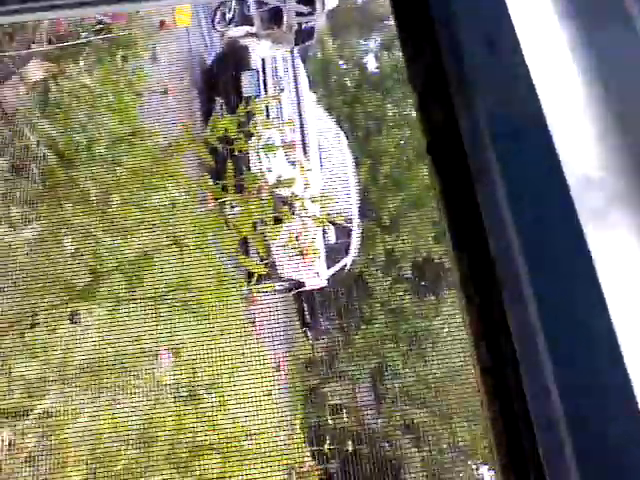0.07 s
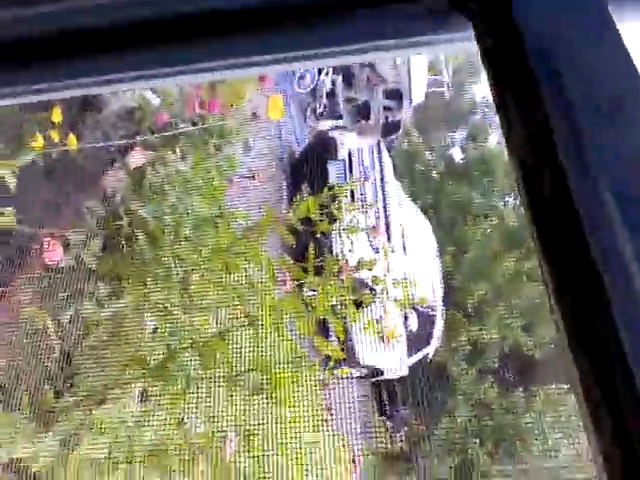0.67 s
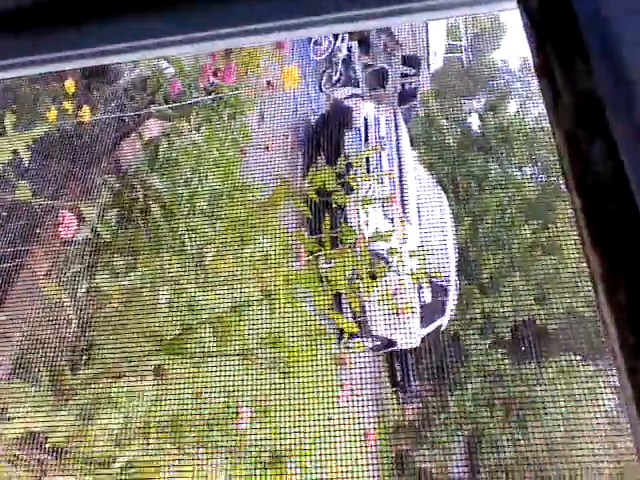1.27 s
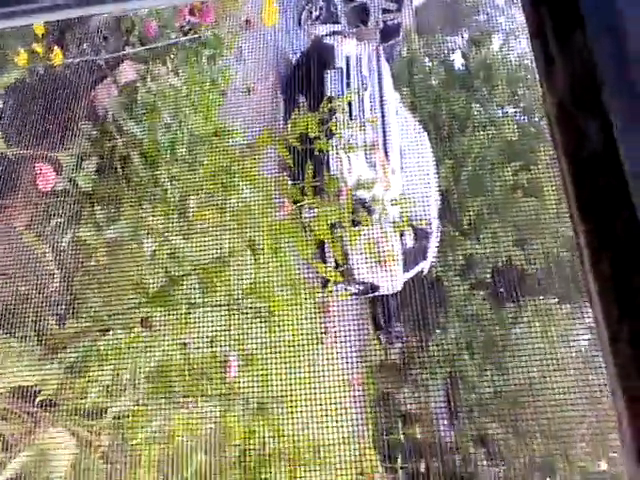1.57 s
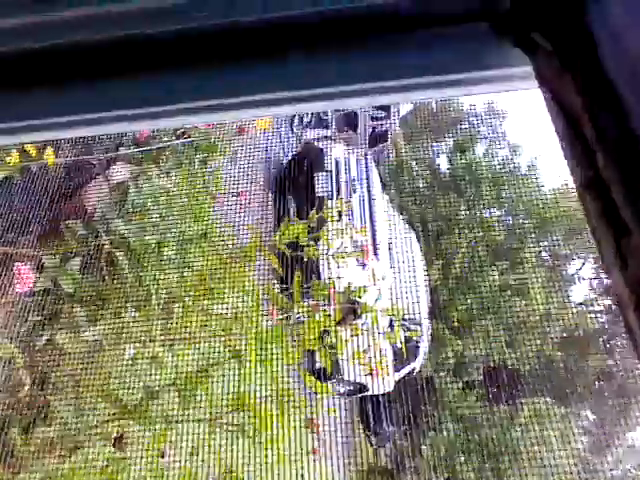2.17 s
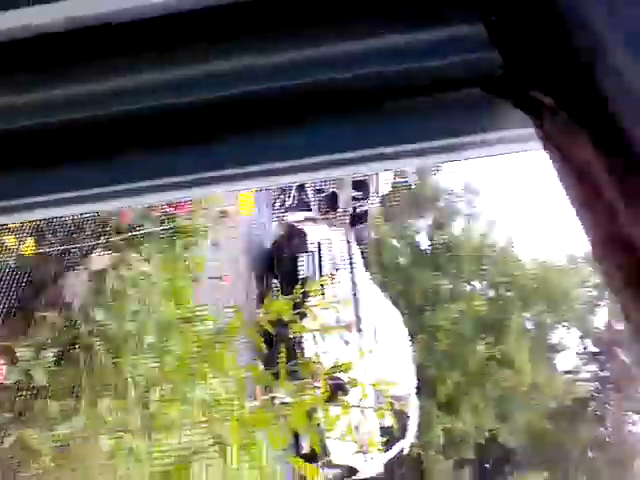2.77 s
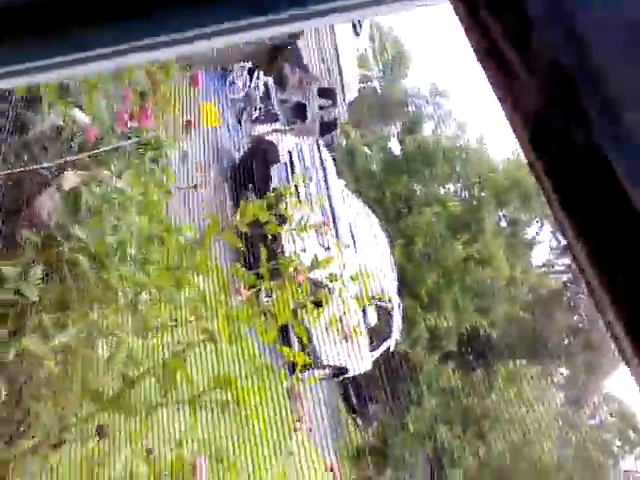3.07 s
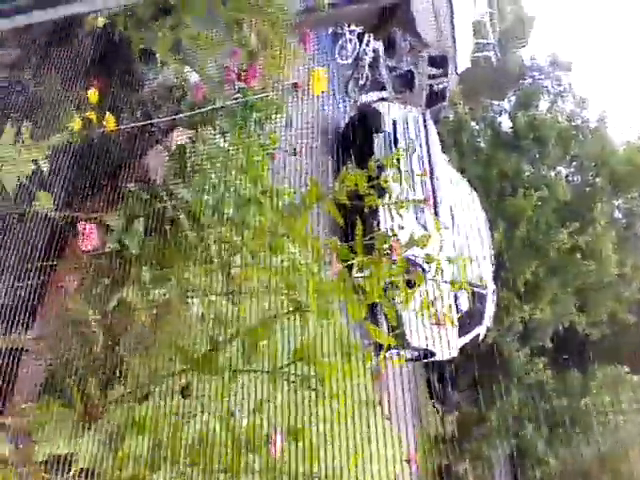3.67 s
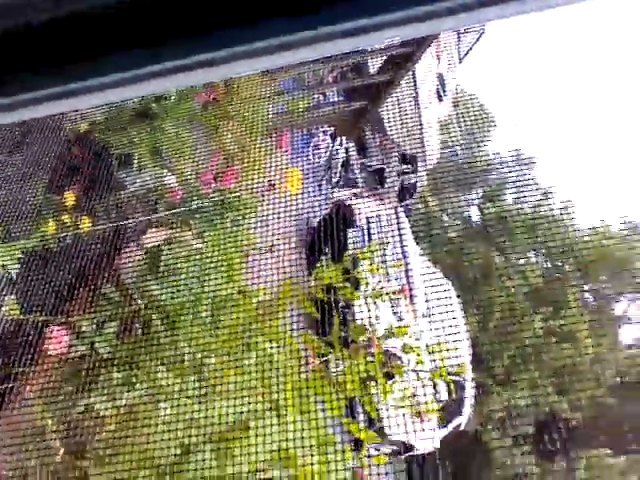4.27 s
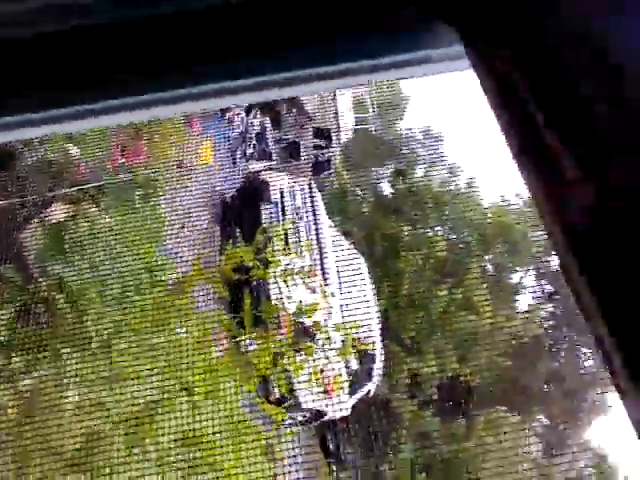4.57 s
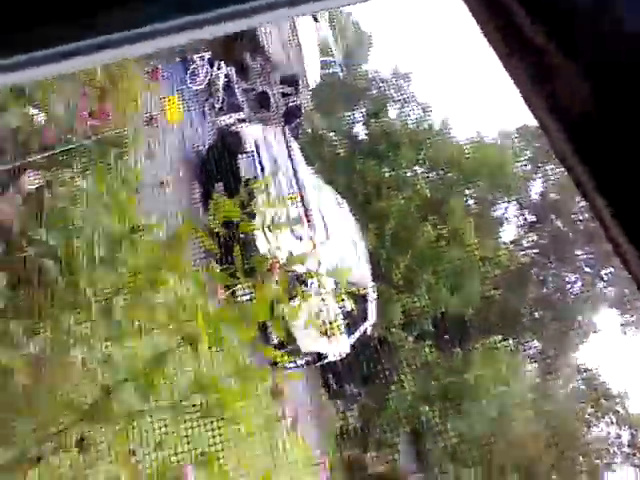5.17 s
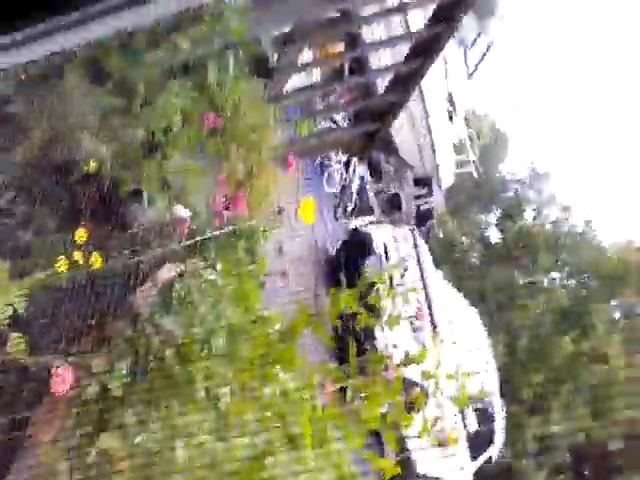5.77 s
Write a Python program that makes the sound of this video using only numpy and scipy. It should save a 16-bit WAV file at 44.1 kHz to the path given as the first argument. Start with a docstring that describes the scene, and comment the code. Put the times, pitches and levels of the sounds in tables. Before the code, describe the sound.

Fingers rub, bump and click on a small camera's plastic case, right at the microphone, over faint outdoor air.

```python
"""Fingers bump, rub and click on the plastic case of a small camera as it is shifted about in the hand.
The case carries it all straight to the microphone, with one short squeak and a few soft palm thuds.
The camera is held behind a window screen. Underneath lie faint outdoor air and the hiss, whine and
buzz of its own electronics."""
import sys
import numpy as np
from scipy import signal
from scipy.fft import rfft, irfft
from scipy.io import wavfile
from scipy.ndimage import uniform_filter1d

SR = 44100
rng = np.random.default_rng(int(sys.argv[2]) if len(sys.argv) > 2 else 0)


def persist_wave(psi):
    """Save psi, clipped to +-1, as 16-bit WAV."""
    counts = np.round(np.clip(psi, -1, 1) * 32767).astype(np.int16)
    wavfile.write(sys.argv[1], SR, np.atleast_2d(counts).T)


N = 264864
TIME = np.arange(N) / SR


def fingers(grip_wander_db=5.5):
    """Strokes over a restless grip, right at the microphone: shell rasp, skin hiss and body rumble."""
    # a finger crossing the case: start_s, length_s, fade_s, rasp_db, hiss_db, rumble_db,
    # force_growth_db, far_side_share
    strokes = [ (0.169, .02, .01, -48.5, -49.5, -57, 2, 0.06),
               (0.278, 0.043, .015, -43, -48.5, -41, 9, 0.6),
               (0.334, 0.17, 0.069, -52, -60, -49, -11, 0.44),
               (0.913, 0.045, .015, -67.5, -79, -55.5, 0, 0.7),
               (1.327, 0.25, 0.039, -61, -74.5, -57, 16, 0.7),
               (1.788, .12, 0.0066, -40.5, -39, -42.5, 1, 0.6), (1.905, 0.069, .008, -43, -54, -50, -4, 1),
               (1.983, 0.12, 0.014, -38.5, -41.5, -40, -6, 0.18),
               (2.133, 0.12, 0.0033, -36.5, -32.5, -44, -2.5, 0.24),
               (2.25, 0.071, 0.0094, -40, -42, -41, -3.5, 0.4),
               (2.402, 0.11, 0.07, -61, -56.5, -53, 5, 0.2), (2.588, .11, 0.011, -43, -45, -41.5, -2, 0.5),
               (2.748, 0.14, 0.014, -51, -56.5, -55.5, -9, 0.67),
               (2.911, .025, 0.0042, -28.5, -33.5, -46, 0.5, 0.77),
               (2.942, 0.041, .003, -38.5, -26.5, -47, 2, 0.14),
               (2.983, 0.079, .01, -55, -56.5, -43.5, -4, 0.35),
               (3.104, 0.11, 0.016, -46, -50, -47.5, 0, 0.66),
               (3.194, .072, 0.012, -39, -30.5, -45.5, 1, 0.08),
               (3.264, .05, .015, -46, -41, -41.5, -4, 0.26),
               (3.309, 0.088, 0.021, -47, -38.5, -57, -5, 0.73),
               (3.374, 0.07, 0.018, -52, -59, -44.5, -6, .8),
               (3.503, 0.16, 0.036, -36.5, -37.5, -42, -6, 0.96),
               (3.651, 0.19, 0.017, -43.5, -41, -49, 9.5, 0.96),
               (3.84, 0.13, 0.028, -37.5, -31, -45, -7.5, .85),
               (3.951, 0.11, 0.039, -35.5, -28.5, -45, -3.5, 0.03),
               (4.397, 0.063, 0.025, -40.5, -56, -43.5, -5, 1),
               (4.481, 0.085, 0.018, -38.5, -32, -39.5, 1, 0.06),
               (4.558, 0.061, 0.0082, -37, -29, -44, 7, 0.2),
               (4.631, 0.039, 0.0068, -38, -42, -31, 3, 0.44),
               (4.693, 0.064, 0.012, -40.5, -46, -39, -8, 0.4),
               (4.894, 0.032, 0.017, -52.5, -74, -40.5, 0, 0.6),
               (5.208, 0.13, 0.038, -55.5, -64, -47, 9, 0.4), (5.328, 0.087, 0.02, -43, -40.5, -44, 8, .05),
               (5.426, .1, .03, -41, -36.5, -39.5, -0.5, 0),
               (5.557, 0.069, 0.032, -44, -47.5, -42.5, -2, 0.07),
               (5.618, 0.16, 0.018, -51.5, -66, -41.5, 17, 0.5),
               (5.752, 0.11, 0.019, -35.5, -38, -42, -6.5, 0.26),
               (5.921, 0.14, 0.018, -44.5, -47.5, -51, 7, 0.15)]
    # resonances that rubbing wakes from either side of the case: pitch_hz, width_hz, near_db, far_db
    body_modes = [(147.6, 92, -23, -9.5), (337, 230, -3.5, -3), (447, 510, -15.5, -11.5)]
    shell_modes = [(752, 366, -6.5, -4.5), (1171, 334, -7.5, -11), (1717, 456, -7, -8),
                   (2354, 770, -4.5, -16.5)]
    hiss_modes = [(3410, 980, -28.5, -9.5), (4954, 1260, -11.5, -5), (6520, 1900, -12.5, -12),
                  (8270, 1280, -8, -21.5), (10030, 1230, -4.5, -33), (11200, 1380, -6, -2.5),
                  (13600, 2200, -22, -13)]
    # rows: rasp, hiss, rumble
    db_per_force_db = np.array([[0.34], [1.82], [0.4]])
    grip_db = np.array([[-71.5], [-74], [-62.5]])  # the hand creeps on the case between strokes
    power = undb(grip_db + grip_wander_db * walk(8)) ** 2
    far_power = power[1] / 2
    for start, length, fade, *layers_db, growth_db, far_side in strokes:
        contact, force_db = stroke(start, length, fade, growth_db)
        on = contact > 0
        stroke_db = np.array(layers_db)[:, None] + db_per_force_db * force_db[on]
        stroke_power = contact[on] * undb(stroke_db) ** 2
        power[:, on] += stroke_power
        far_power[on] += np.clip(far_side, 0, 1) * stroke_power[1]
    rasp_db, hiss_db, rumble_db = 10 * np.log10(power)
    far = far_power / power[1]
    rumble = rubbed(body_modes, rumble_db, far, rate=1800, spread_db=4.5, flutter_db=0.85, brighten=0.19)
    rasp = rubbed(shell_modes, rasp_db, far, rate=7000, spread_db=0.5, flutter_db=2.0, brighten=0.46)
    hiss = rubbed(hiss_modes, hiss_db, far, rate=20000, spread_db=4.0, flutter_db=1.9, brighten=0.3)
    return rumble + shell(rasp) + hiss


def stroke(start, length, fade, growth_db, arch_db=1):
    """A finger's contact (0-1) fades in and out; its force (dB) arches and leans towards one end."""
    inside_s = np.minimum(TIME - start, start + length - TIME)
    contact = np.clip(inside_s / fade / 2 + .5, 0, 1) ** 2
    along = np.clip((TIME - start) / length, 0, 1)
    return contact, growth_db * (along - .5) + arch_db * (np.sin(np.pi * along) - 1)


def rubbed(modes, level_db, far, rate, spread_db, flutter_db, brighten, firm_db=-40):
    """Skin sticks and slips on plastic; the place and force of contact set how each resonance answers."""
    out, centre_octave = 0, np.mean(np.log2(np.array(modes)[:, 0]))
    force_db = np.clip(level_db - firm_db, -20, 10)
    for hz, width, near_db, far_db in modes:
        gain = np.sqrt((1 - far) * undb(near_db) ** 2 + far * undb(far_db) ** 2)
        tilt_db = brighten * force_db * (np.log2(hz) - centre_octave)  # a light touch is dull
        wander_db = 1.1 * walk(9)  # each resonance comes and goes as the finger crosses nodes
        slips = impulses(rate, spread_db)
        out = out + gain * undb(tilt_db + wander_db) * unit(band(slips, hz, width))
    return out * undb(level_db + flutter_db * walk(110))  # finger pressure is never quite even


def shell(rasp, top_hz=2726):
    """The hollow shell passes little rasp above a steep upper edge."""
    return signal.sosfilt(signal.butter(10, top_hz, fs=SR, output="sos"), rasp)


def knocks(swell_s=0.0014, after_share=0.044, after_t60_s=0.03, detune=0.11, focus_octaves=0.71):
    """The shell clacks and the whole body rocks for a few cycles; hard contacts add a tick."""
    # hard clicks of the case: start_s, thump_hz, thump_db, clack_db, clack_cutoff_hz, tick_db, tick_hz
    clicks = [ (1.7854, 304, -21.5, -8, 1930, -5, 5750), (1.983, 373, -20.5, -10, 2400, -24, 6160),
              (2.3104, 400, -39, -23.5, 1380, -30, 3970), (2.336, 318, -33, -31, 1410, -41, 3500),
              (2.5873, 428, -14, -12.5, 2060, -12, 3870), (2.728, 400, -55, -40, 2400, -33, 4750),
              (2.8833, 335, -35, -33.5, 980, -34, 4440), (2.9083, 517, -22, -18, 2300, -20, 5200),
              (2.944, 360, -27, -34, 1000, -18, 9000), (3.018, 374, -10, -9.5, 2380, -17, 3500),
              (3.0194, 338, -36, -24, 2000, -14, 9100), (3.1937, 205, -28.5, -10, 2710, -12, 7700),
              (3.32, 395, -21, -16.5, 1960, -20.5, 9000), (3.4486, 332, -29.5, -12.5, 1170, -40, 3320),
              (3.5264, 345, -18, -13.5, 1540, -22.5, 5000), (3.5687, 650, -26, -25.5, 1000, -8.5, 9300),
              (3.8814, 394, -13, -5.5, 1820, -13, 5100), (4.6321, 356, -13.5, -9, 2400, -12, 3630),
              (4.6355, 344, -29, -10, 1780, -21, 3300), (4.6916, 427, -25, -25.5, 1510, -23, 4700),
              (5.3328, 330, -38, -23.5, 1520, -33, 4440)]
    # soft bumps of a fingertip: start_s, thump_hz, thump_db, clack_db
    bumps = [ (.088, 250, -40.5, -50), (.124, 243, -35.5, -44), (.23, 275, -36.5, -35.5),
             (.465, 293, -35, -36), (.948, 300, -33, -39), (1.04, 252, -38.5, -43.5),
             (1.145, 290, -45, -42.5), (1.4728, 300, -35.5, -32), (1.525, 300, -28.5, -48),
             (1.734, 354, -28, -32.5), (2.0623, 320, -23, -32), (2.073, 307, -23.5, -33),
             (2.0813, 418, -23, -26.5), (2.0878, 357, -15.5, -17.5), (2.1805, 352, -18.5, -19),
             (2.2866, 356, -24.5, -30), (2.349, 277, -23, -32.5), (3.486, 400, -41, -35),
             (4.038, 306, -25.5, -31), (4.257, 330, -42.5, -40.5), (4.354, 274, -35, -46.5),
             (4.486, 400, -29.5, -25.5), (4.521, 317, -26, -43), (4.807, 282, -29.5, -35.5),
             (5.058, 413, -42, -39), (5.102, 282, -23.5, -32.5), (5.2042, 298, -29.5, -29.5),
             (5.3231, 386, -25.5, -29), (5.358, 387, -26, -32.5), (5.6785, 284, -27.5, -31)]
    # what a knock rings with: pitch_hz, t60_s, signed_strength
    clack_modes = [(682, 0.01, 0.56), (1130, 0.0091, -0.4), (1670, 0.003, -1.01), (2186, 0.0099, 0.73),
                   (2600, 0.0077, 0.21)]
    tick_modes = [(2950, 0.008, 0.66), (5420, 0.0039, -0.71), (7500, 0.0013, 0.82), (8520, 0.0034, -0.59),
                  (10960, 0.0048, 0.71)]
    out, t = np.zeros(N), TIME[:SR // 16]
    rocking = t / swell_s * np.exp(-t / swell_s) + after_share * np.exp(-np.log(1000) * t / after_t60_s)

    def blow(hz, thump_db, clack_db, cutoff_hz, shifts):
        """Thump and clack; a soft contact leaves the upper shell modes quiet."""
        softness = signal.butter(4, min(cutoff_hz, SR / 4), fs=SR)
        clack = signal.lfilter(*softness, ring(clack_modes, t, shifts))
        thump = -np.sin(2 * np.pi * hz * t) * rocking
        return peak(thump, thump_db) + peak(clack, clack_db)

    for start, hz, thump_db, clack_db, cutoff_hz, tick_db, tick_hz in clicks:
        shifts = detune * rng.standard_normal(len(clack_modes))
        # the spot that is struck favours the stiff modes near one pitch
        woken = [(mode_hz, t60, strength * np.exp(-(np.log2(mode_hz / tick_hz) / focus_octaves) ** 2))
                 for mode_hz, t60, strength in tick_modes]
        tick = peak(ring(woken, t, shifts), tick_db)
        add(out, start, blow(hz, thump_db, clack_db, cutoff_hz, shifts) + tick)
    for start, hz, thump_db, clack_db in bumps:
        shifts = detune * rng.standard_normal(len(clack_modes))
        cutoff_hz = 1100 * 2 ** (0.21 * (clack_db - thump_db))  # a harder contact reaches higher
        add(out, start, blow(hz, thump_db, clack_db, cutoff_hz, shifts))
    # the knocks carry little below about 140 Hz
    return signal.lfilter(*signal.butter(2, 140, "highpass", fs=SR), out)


def ring(modes, t, shifts):
    """Heavily damped plastic modes, each shifted a little in pitch by the grip."""
    return sum(strength * np.sin(2 * np.pi * hz * (1 + shift) * t) * np.exp(-np.log(1000) * t / t60)
               for (hz, t60, strength), shift in zip(modes, shifts))


def palm(width_share=0.71):
    """Soft flesh loads the case slowly and gives only a low thud."""
    # presses of the palm: start_s, swell_s, pitch_hz, peak_db
    presses = [(3.023, 0.0084, 90, -43), (3.395, 0.016, 155, -33.5), (4.641, 0.0072, 195, -34.5),
               (5.168, 0.008, 107, -26.5), (5.213, 0.012, 85, -37)]
    out, t = np.zeros(N), TIME[:SR // 4]
    for start, swell, hz, peak_db in presses:
        shudder = band(rng.standard_normal(2 * len(t)), hz, hz * width_share)[len(t):]
        envelope = (t / swell) ** 2 * np.exp(-t / swell)
        add(out, start, peak(shudder * envelope, peak_db))
    return out


def squeak(start_s=4.505, length_s=.1, glide_hz=(2320, 2540), jitter_hz=110, level_db=-39.5):
    """A fingertip drags and its slips lock into a rough tone that rises."""
    contact, _ = stroke(start_s, length_s, fade=0.013, growth_db=0)
    hz = np.interp(TIME - start_s, [0, length_s], glide_hz) + jitter_hz * walk(500)
    flutter_db = 3 * walk(150)
    return contact * undb(level_db + flutter_db) * np.sin(2 * np.pi * np.cumsum(hz) / SR)


def electronics(buzz_hz=59.9, burst_s=0.0071, uneven_db=2.0, whine_hz=9638, whine_db=-60.5):
    """The camera's circuits give a thin whine and an uneven spurt of sizzle on every cycle of a buzz."""
    # strength of the buzz: time_s, level_db
    buzz_levels = [(0, -54.5), (.8, -58), (1.4, -53.5), (2.5, -57.5), (4.2, -59.5), (6.0, -62)]
    cycle, phase = np.divmod(TIME * buzz_hz, 1)
    sizes = undb(uneven_db * rng.standard_normal(int(cycle[-1]) + 1))
    spurts = sizes[cycle.astype(int)] * np.exp(-phase / buzz_hz / burst_s)
    crackle = spurts * impulses(rate=12000, spread_db=0)
    sizzle = unit(band(crackle, hz=11150, width_hz=1400))
    sizzle_db = np.interp(TIME, *np.transpose(buzz_levels))
    whine = unit(np.sin(2 * np.pi * whine_hz * TIME))
    return undb(sizzle_db) * sizzle + undb(whine_db) * whine


def air(level_db=-56.5):
    """Faint, steady outdoor air beyond the screen, and microphone hiss."""
    # colour of the air and hiss: frequency_hz, relative_density_db
    spectrum = [(18, -49), (30, -2.5), (199, 6.5), (328, -15), (499, -7.5), (666, 0), (721, -16),
                (801, -15.5), (1130, -6.5), (2610, -9), (3140, -11), (4190, -15), (8980, -10.5), (9970, -3),
                (16000, -13.5)]
    hz, db = np.transpose(spectrum)
    bins_hz = np.fft.rfftfreq(N, 1 / SR) + 1
    colour = undb(np.interp(np.log(bins_hz), np.log(hz), db))
    return unit(irfft(rfft(rng.standard_normal(N)) * colour, N)) * undb(level_db)


def impulses(rate, spread_db):
    """Tiny impulses of uneven size at random times, about `rate` a second."""
    size, spread = rng.standard_normal((2, N))
    return (rng.random(N) < rate / SR) * size * undb(spread_db * spread)


def walk(rate_hz):
    """A smooth random drift with rms 1."""
    hold = int(SR / rate_hz)
    steps = np.repeat(rng.standard_normal(N // hold + 1), hold)
    return unit(uniform_filter1d(steps, hold)[:N])


def band(x, hz, width_hz):
    """A steep-sided resonance."""
    edges = np.clip([hz - width_hz / 2, hz + width_hz / 2], 15, .48 * SR)
    return signal.sosfilt(signal.butter(2, edges, "bandpass", fs=SR, output="sos"), x)


def undb(db):
    """Decibels to gain."""
    return 10 ** (np.asarray(db) / 20)


def unit(x):
    """Scale to rms 1."""
    return x / np.sqrt(np.mean(x ** 2))


def peak(x, db):
    """Scale to a peak level."""
    return x * undb(db) / np.abs(x).max()


def add(out, start_s, sound):
    """Mix a short sound in at a time."""
    i = max(int(start_s * SR), 0)
    out[i:i + len(sound)] += sound[:max(N - i, 0)]


def scene():
    """Handling and background meet at the camera's one microphone."""
    return (fingers() + squeak() + knocks() + palm() + air() + electronics())[None]


def record(dry, top_hz=16000):
    """The camera cuts off the highest treble."""
    return signal.sosfilt(signal.ellip(8, .2, 70, top_hz, fs=SR, output="sos"), dry)


dry = scene()
out = record(dry)
persist_wave(out)
```